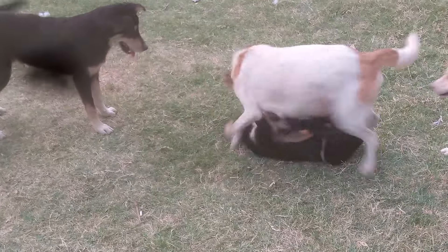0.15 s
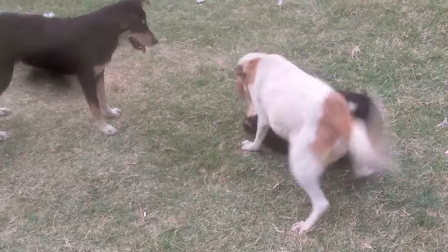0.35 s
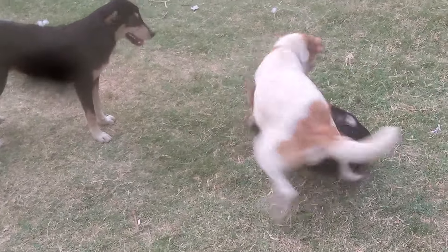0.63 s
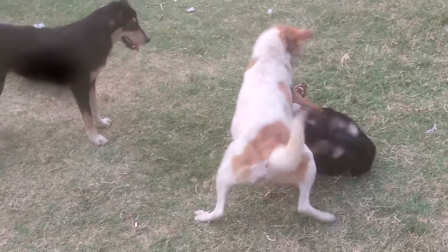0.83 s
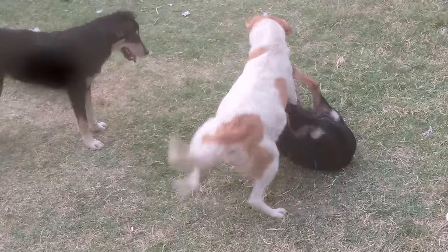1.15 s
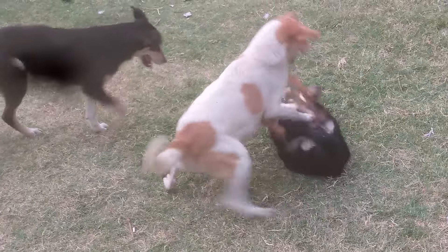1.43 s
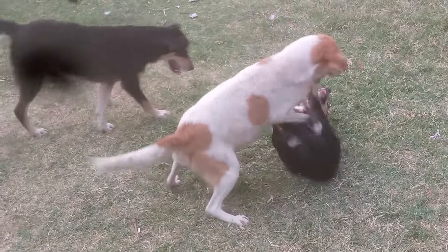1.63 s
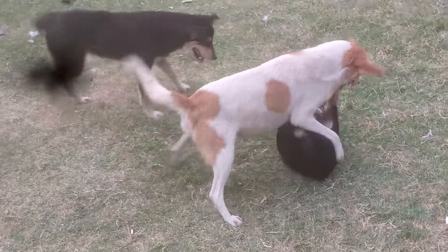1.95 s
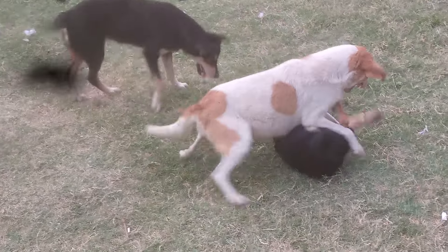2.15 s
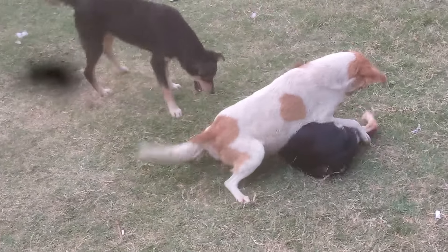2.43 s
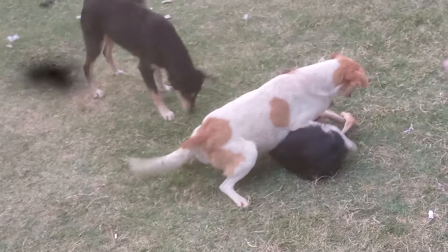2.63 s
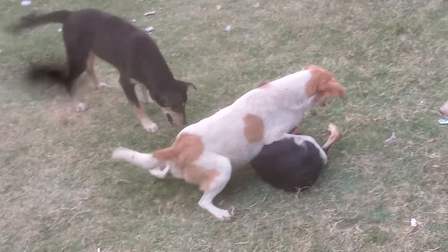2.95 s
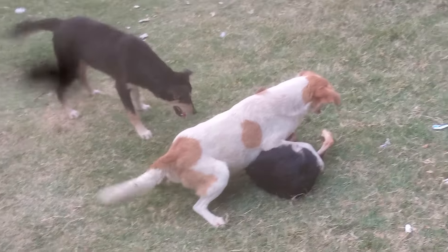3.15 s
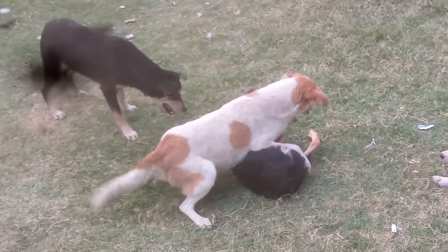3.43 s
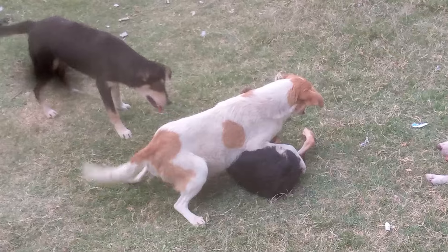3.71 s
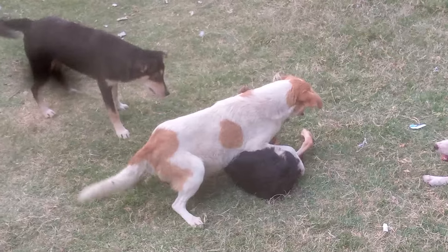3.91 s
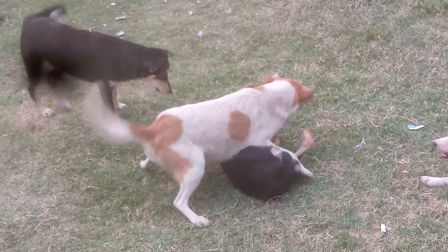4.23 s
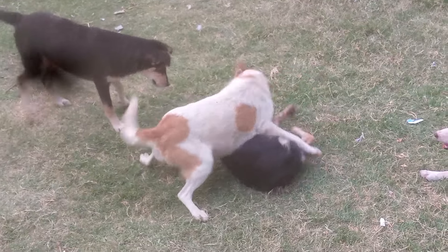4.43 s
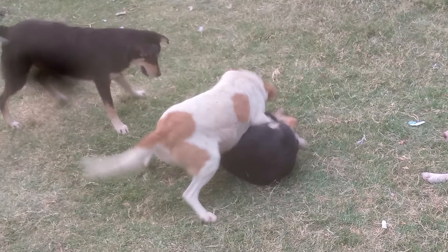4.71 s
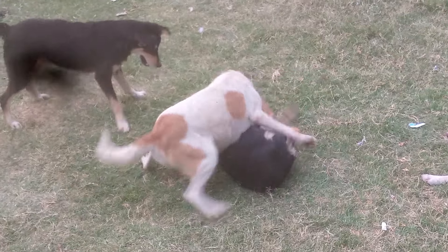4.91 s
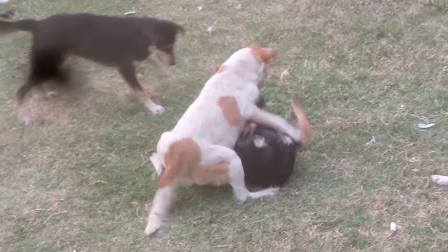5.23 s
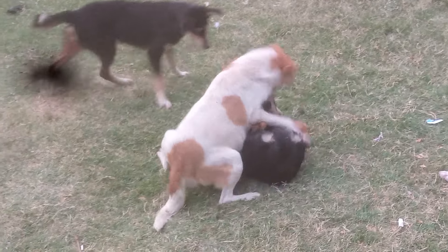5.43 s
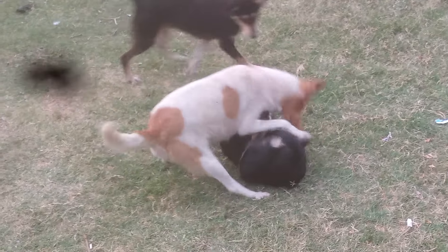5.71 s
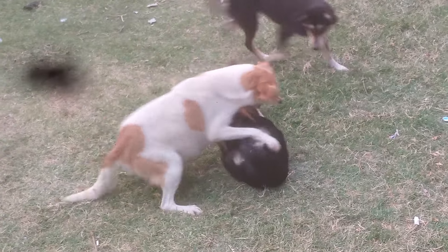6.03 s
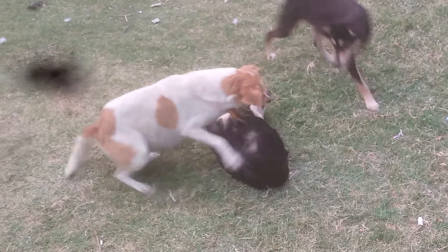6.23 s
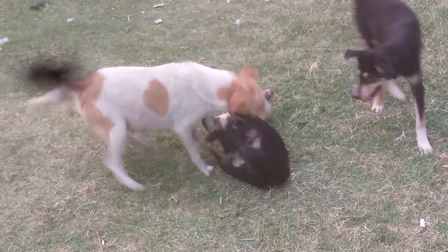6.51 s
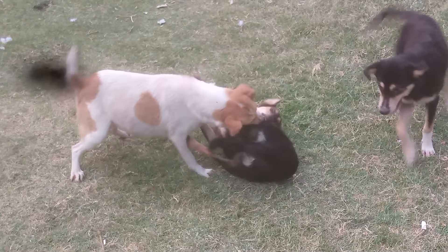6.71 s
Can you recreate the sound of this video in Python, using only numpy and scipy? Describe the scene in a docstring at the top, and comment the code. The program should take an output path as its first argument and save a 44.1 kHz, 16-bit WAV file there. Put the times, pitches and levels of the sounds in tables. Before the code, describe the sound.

Several dogs roughhouse on an open lawn a few metres from a small microphone. Hoarse snarls and quick piercing yelps crowd the first second, then a bark and quieter growling. Another short bark breaks in midway, followed by a sustained snarling outburst, fresh yelps and a last bark near the end. Dry grass rustles faintly, with a slight echo off a wall.

```python
"""Snarls and yelps burst out first: dogs wrestle on a lawn a few metres from a small microphone.
Snarls and barks are rough fold pulses ringing through throat, mouth, lips and teeth; yelps are thin,
near-pure high whistles; growls are puffs of air ringing a chest. A wall echoes, a bird whistles far off,
noise makes the grass rustle and the open air hum, and teeth and claws click."""
import sys
import numpy as np
from scipy import signal
from scipy.io import wavfile
from scipy.ndimage import uniform_filter1d

SR = 44100
rng = np.random.default_rng(int(sys.argv[2]) if len(sys.argv) > 2 else 0)


def bounce(signal):
    """Save signal as a 16-bit WAV file at the path given by the first command-line argument."""
    frames = np.transpose(np.atleast_2d(signal))
    limited = np.clip(frames, -1, 1)
    pcm = np.round(limited * 32767).astype(np.int16)
    wavfile.write(sys.argv[1], SR, pcm)


N = 302526


def gain_of(db):
    """Decibels to amplitude."""
    return 10 ** (np.asarray(db) / 20)


def evened(x):
    """Scales to rms 1."""
    return x / np.sqrt(np.mean(x ** 2) + 1e-20)


def add(mix, s, sound):
    """Mixes a sound in at s seconds."""
    part = mix[round(s * SR):][:len(sound)]
    part += sound[:len(part)]


def played(rows):
    """Start time and the columns of a table, joined sample by sample."""
    s, *columns = np.transpose(rows)
    t = np.arange(s[0], s[-1], 1 / SR)
    return s[0], *(np.interp(t, s, c) for c in columns)


def curve(rows):
    """A table of (seconds, dB) as a gain over the whole scene."""
    return gain_of(np.interp(np.arange(N) / SR, *np.transpose(rows)))


def patches(shape, band_span, frame_span):
    """Random blobs over frequency and time, rms 1."""
    blobs = uniform_filter1d(rng.standard_normal(shape), size=band_span, axis=0)
    return evened(uniform_filter1d(blobs, size=frame_span, axis=1))


def unsteady(count, size, depth):
    """A gain that trembles about 1, blurring a tone."""
    slow = uniform_filter1d(uniform_filter1d(rng.standard_normal(count), size), size)
    return 1 + depth * evened(slow)


def resonate(x, hz, width):
    """Shifts the curve hz down to zero, smooths twice, and shifts back: a steep resonance."""
    turn = np.exp(2j * np.pi * np.cumsum(hz * np.ones(len(x))) / SR)
    r = np.exp(-np.pi * width / SR)
    return 2 * (turn * signal.lfilter([(1 - r) ** 2], np.poly([r, r]), x / turn)).real


def steady(x, span_s):
    """Divides out the slow level, so that effort alone sets loudness."""
    return x / np.sqrt(abs(uniform_filter1d(x ** 2, round(span_s * SR))) + 1e-20)


BASS_DB, HUM_PATCHY_DB = -81, 3  # steady bass level; rms depth of the patches
# Colour of the open air. Each row: frequency in Hz, relative noise density in dB.
AIR_COLOUR = [(18, -36.5), (30, -14.5), (118, -7), (419, -28), (670, -26), (784, -21), (1160, -24.5),
              (1410, -23.5), (1750, -24), (2250, -32.5), (3200, -60.5), (4160, -82), (7040, -120)]
# The hum over the lawn above 350 Hz. Each row: time in seconds, level in dB.
HUM_LEVEL = [(0, -35), (.76, -74.5), (1.01, -62), (1.3, -71.5), (1.6, -60), (2.83, -74.5), (3.4, -61.5),
             (3.69, -67.5), (4.11, -73.5), (5.0, -62), (5.33, -68), (5.66, -66.5), (6.1, -62.5),
             (6.4, -66.5), (6.86, -65)]
# A faint fizz around 15200 Hz. Each row: time in seconds, level in dB.
FIZZ_LEVEL = [(0.05, -83), (0.959, -80.5), (1.038, -67.5), (1.089, -88), (1.85, -76.5), (2.06, -115),
              (2.32, -69), (2.4, -100), (2.671, -79), (3.03, -91.5), (5.739, -86), (6.058, -80),
              (6.55, -90), (6.61, -68), (6.78, -99), (6.86, -94)]


def air():
    """Patchy outdoor hum over a steady bass, swelling with the breath of each snarl, and a fizz at the top."""
    frames, hz = N // 256 + 5, np.fft.rfftfreq(1024, 1 / SR)[:, None]
    a, b = rng.standard_normal((2, 513, frames))
    noise = (a + 1j * b) * gain_of(HUM_PATCHY_DB * patches((513, frames), 5, 8))
    f, db = np.transpose(AIR_COLOUR)
    colour = gain_of(np.interp(np.log(hz + 1), np.log(f), db))
    top = gain_of(-12 * ((hz - 15200) / 1500) ** 2)
    shapes = colour * (hz <= 350), colour * (hz > 350), top
    bass, hum, fizz = (evened(signal.istft(noise * m, nperseg=1024, noverlap=768)[1][:N]) for m in shapes)
    return gain_of(BASS_DB) * bass + (curve(HUM_LEVEL) + breath()) * hum + curve(FIZZ_LEVEL) * fizz


BIRD_FALL_S, BIRD_FADE_DB = .035, -24.5  # time constant of glide and fade; depth of the fade
# Gliding whistles far off. Each row: start and length in seconds, start and end pitch in Hz,
# level at the start in dB.
BIRD_WHISTLES = [(1.667, 0.17, 3760, 2860, -57), (1.963, 0.16, 3840, 3300, -64),
                 (5.949, 0.15, 3840, 3970, -49.5), (6.105, 0.21, 4200, 3074, -48.5)]


def bird(start, length, hz, end_hz, db):
    """A slightly hoarse whistle: pitch and level settle together, fast at first."""
    t = np.arange(0, length, 1 / SR)
    settling = np.exp(-t / BIRD_FALL_S)
    glide = end_hz + (hz - end_hz) * settling
    tone = unsteady(len(t), 120, 0.53) * np.sin(2 * np.pi * np.cumsum(glide) / SR)
    level = gain_of(db + BIRD_FADE_DB * (1 - settling))
    return start, np.sqrt(2) * level * tone * signal.windows.tukey(len(t), .15)


GRASS_PATCHY_DB = 7  # rms depth of the patches
# Dry grass under paws. Each row: time in seconds, level in dB.
RUSTLE_LEVEL = [(0, -47.5), (.32, -63.5), (.71, -73), (1.13, -66), (1.36, -89), (1.53, -62.5),
                (1.87, -72.5), (4.26, -116), (4.34, -51), (4.93, -77), (5.2, -75.5), (5.58, -69),
                (5.69, -68.5), (6.1, -61.5), (6.32, -77.5), (6.61, -72), (6.73, -55.5), (6.86, -93)]
# Colour of the grass. Each row: frequency in Hz, relative noise density in dB.
GRASS_COLOUR = [(2300, -25), (2700, 3.5), (3800, 9), (4800, -12), (5800, -5), (7200, -32.5), (12000, -29.5),
                (15800, -27)]


def rustle():
    """Thin, very patchy treble noise."""
    frames, hz = N // 128 + 5, np.fft.rfftfreq(512, 1 / SR)[:, None]
    a, b = rng.standard_normal((2, 257, frames))
    f, db = np.transpose(GRASS_COLOUR)
    colour_db = np.interp(np.log(hz + 1), np.log(f), db, left=-90)
    patchy_db = GRASS_PATCHY_DB * patches((257, frames), 3, 14)
    hiss = signal.istft((a + 1j * b) * gain_of(colour_db + patchy_db), nperseg=512, noverlap=384)[1]
    return curve(RUSTLE_LEVEL) * evened(hiss[:N])


# Teeth and claws. Each row: start in seconds, level at the start in dB.
TICKS_AT = [(0.676, -66), (4.0771, -72), (4.1165, -58.5), (5.537, -61), (5.5574, -54.5), (6.5959, -51),
            (6.6164, -51)]


def tick(db):
    """A dry bright click: a high tone dying within milliseconds."""
    t = np.arange(100) / SR
    return gain_of(db - 60 * t / 0.0028) * np.sin(2 * np.pi * 11500 * t)


YARD_DB, YARD_T60 = -33, 0.65  # level of the scattered tail; seconds to fall 60 dB
# The wall. Each row: echo delay in seconds, level in dB.
WALL_ECHOES = [(0.033, -15.5), (.09, -26.5), (.17, -35)]


def yard(x):
    """Single echoes off a wall, with a dull scattered tail."""
    t = np.arange(SR // 2) / SR
    scatter = rng.choice([-1., 1.], len(t)) * (rng.random(len(t)) < .05) * (t > .02)
    tail = signal.lfilter(*signal.butter(2, 3000, fs=SR), scatter * gain_of(-60 * t / YARD_T60))
    tail *= gain_of(YARD_DB) / np.linalg.norm(tail)
    for s, db in WALL_ECHOES:
        add(tail, s, gain_of([db]))
    return signal.oaconvolve(x, tail)[:N]


def streaky(x, patchy_db=3.3):
    """Streaky, patchy sound: narrow bands swell and fade at random."""
    z = signal.stft(x, nperseg=1024, noverlap=768)[2]
    gain = gain_of(patchy_db * patches(z.shape, 3, 8))
    return signal.istft(z * evened(gain), nperseg=1024, noverlap=768)[1][:N]


def folds(hz, rough, weak_db, count):
    """Vocal folds: strong and weak pulses in turn, drifting, shaken and mixed with puffs of air."""
    shake, drift = (evened(uniform_filter1d(rng.standard_normal(count), size)) for size in (200, 5000))
    turns = np.cumsum(hz * (1 + 0.19 * rough * shake + .08 * drift)) / SR
    cycle = turns.astype(int)
    size_db = rough * 3 * rng.standard_normal(cycle[-1] + 1)[cycle] + weak_db * (cycle % 2)
    pulses = np.diff(cycle, prepend=0) * np.sqrt(SR / hz)
    puffs = evened((0.68 + np.exp(-(turns % 1) / 0.77)) * rng.standard_normal(count))
    return gain_of(size_db) * ((1 - rough) * pulses + rough * puffs)


GROWL_HZ = 63.45  # mean puff rate
GROWL_EDGE_S, PURR_DB = .06, -74.5  # fade at each end; a faint purr lies under all growls
# Resonances of the chest, lowest first. Each row: frequency in Hz, width of each smoothing in Hz,
# relative level in dB (the lowest is levelled apart from the rest).
CHEST_RINGS = [(116, 68, 0), (190, 20, 10.5), (276, 26, 5.5), (350, 7.7, -17)]
# Chest growls. Each row: start and length in seconds, effort in dB, change to the end in dB,
# share of the lowest resonance in dB.
GROWLS_AT = [(0, 0.08, -46.5, -2, -11), (0.161, 0.6, -44.5, -14.5, -26), (0.744, 0.57, -66.5, -7, -4.5),
             (1.416, 0.69, -57, -8.5, -1), (2.106, 0.37, -48.5, -25, 0), (2.709, .9, -49, -7, -2),
             (4.24, 0.12, -57, -5, -9.5), (4.471, 0.59, -47, -1.5, -26.5), (5.243, 0.31, -57.5, -6, 0),
             (5.669, 0.35, -54, -1, -8), (5.977, .13, -54.5, -3, 0), (6.134, 0.24, -50.5, -22, -1.5),
             (6.678, .25, -57, 15, -6)]


def growl():
    """Slow uneven puffs of air ring the chest with the mouth shut."""
    drive = folds(GROWL_HZ, 1.0, -1.6, N)
    low, *upper = (gain_of(db) * resonate(drive, f, w) for f, w, db in CHEST_RINGS)
    low, upper = steady(low, 1.0), steady(sum(upper), 0.93)
    out, t = gain_of(PURR_DB) * (low + upper), np.arange(N) / SR
    for start, length, effort_db, change_db, low_db in GROWLS_AT:
        edges = np.clip(np.minimum(t - start, start + length - t) / GROWL_EDGE_S, 0, 1) ** 2
        share = np.clip(gain_of(low_db), 0, .95)
        level = edges * gain_of(effort_db + change_db * np.clip((t - start) / length, 0, 1))
        out += level * (share * low + np.sqrt(1 - share ** 2) * upper)
    return out


FLUTTER_HZ = 115.7  # mean rate
SOFT_DB, TREMBLE_PER_DB = -33.5, 0.08  # tones below this level tremble more, by this depth per dB
# Yelps, one table each. Each row: time in seconds, pitch in Hz, level in dB, flutter depth 0-1.
YELP_TRACKS = [
    [(0.59, 2037, -40.5, 0.07), (0.612, 1932, -24.5, 0.04), (0.644, 2107, -26.5, 0.02),
     (0.69, 2012, -16.5, 0), (0.708, 1910, -42.5, 0.1), (0.716, 2077, -43.5, 0.14), (0.8, 2048, -51, 0)],
    [(0.962, 1880, -61.5, 0.05), (0.968, 2066, -29, 0.13), (0.976, 1938, -15.5, 0), (0.99, 1727, -22, 0.14),
     (1.004, 1729, -17.5, 0.05), (1.048, 1922, -16.5, 0), (1.105, 1709, -43.5, 0.05)],
    [(1.11, 1876, -45, 0.05), (1.122, 1845, -31, 0.05), (1.134, 1920, -47, 0), (1.16, 1920, -25, 0),
     (1.202, 1959, -23, 0.02), (1.232, 1957, -39.5, 0), (1.3, 1914, -47, 0.05)],
    [(0.3, 1920, -37, 0), (0.318, 2121, -39.5, 0.05), (0.336, 1943, -24.5, 0), (0.366, 1953, -18.5, 0.1),
     (0.42, 1985, -46.5, 0.13)],
    [(0.44, 1945, -58, 0.15), (0.47, 1970, -26, 0.1), (0.51, 1966, -24, 0), (0.558, 1880, -33.5, 0),
     (0.58, 1974, -45.5, 0.1)],
    [(2.1, 2024, -75, 0.11), (2.162, 1893, -61.5, 0.2), (2.216, 2020, -62, 0.2), (2.32, 1994, -62.5, 0.2),
     (2.33, 1890, -58, 0.1)],
    [(2.37, 2297, -70.5, 0.05), (2.408, 2325, -57.5, 0.07), (2.446, 2322, -72, 0.1), (2.486, 2306, -70, 0),
     (2.56, 2180, -69, 0.16)],
    [(6.03, 2150, -62.5, 0.1), (6.046, 2134, -41.5, 0), (6.084, 2183, -36, 0.04), (6.132, 2236, -53.5, 0),
     (6.2, 2207, -74.5, 0.13)],
    [(5.138, 2340, -45, 0), (5.152, 2197, -41, .3), (5.166, 1948, -18, 0.05), (5.18, 1921, -16, 0.09),
     (5.2, 2010, -31.5, .4), (5.3, 1932, -49.5, 0.77)],
    [(5.308, 2286, -47, 0.1), (5.325, 2100, -33, 0), (5.34, 1960, -26, 0.2), (5.36, 1960, -27, .2),
     (5.385, 1983, -47, 0.8), (5.5, 2030, -76.5, 0.3)],
    [(5.838, 2400, -66, 0.1), (5.848, 2243, -27, 0), (5.866, 2020, -22.5, 0.06), (5.89, 2018, -28, 0.42),
     (5.92, 2100, -42, 0.9), (6.0, 2074, -50, 0.8)],
]
# Overtones of a yelp. Each row: multiple of the pitch, level in dB for a yelp at -25.5 dB.
YELP_OVERTONES = [(2, -33), (3, -41.5), (4, -51)]


def yelp(rows):
    """A near-pure whistle of the folds with broken overtones; a slower flutter throws side tones above it."""
    s, hz, level_db, depth = played(rows)
    count = len(hz)
    phase = 2 * np.pi * np.cumsum(hz) / SR
    flutter = 2 * np.pi * FLUTTER_HZ * np.cumsum(unsteady(count, 400, .15)) / SR
    tremble = 0.092 + TREMBLE_PER_DB * np.maximum(SOFT_DB - level_db, 0)
    side_tones = np.sin(phase + flutter) + np.sin(phase + 2 * flutter)
    tone = unsteady(count, 200, tremble) * np.sin(phase) + depth * unsteady(count, 90, 0.27) * side_tones
    strain_db = -0.1 * (level_db + 25.5)  # overtones linger as the cry fades
    for k, db in YELP_OVERTONES:
        broken = unsteady(count, 60, .6) * unsteady(count, 600, .4)
        overtone = np.sin(k * phase) + depth * np.sin(k * (phase + 2 * flutter))
        tone += gain_of(db + strain_db) * broken * overtone
    return s, np.sqrt(2) * gain_of(level_db) * tone * signal.windows.tukey(count, .08)


# Steady ring of the teeth. Each row: frequency in Hz, width of each smoothing in Hz, relative level in dB.
TEETH_RINGS = [(2385, 130, 9), (3440, 900, -0.5), (5940, 2500, -26)]


def voice(rows, pulse_hz, rough, mouth_width, weak_db):
    """The folds sound through throat, mouth, cheeks, lips and the rasp at the teeth."""
    s, effort_db, throat_hz, throat_db, mouth_hz, lips_hz, lips_db, rasp_db, rasp_hz = played(rows)
    drive = folds(pulse_hz, rough, weak_db, len(effort_db))
    # an open mouth radiates no bass
    drive = signal.sosfilt(signal.butter(6, 390, "high", fs=SR, output="sos"), drive)
    throat = steady(resonate(drive, throat_hz, 210), 0.057)
    cheeks = gain_of(-13.5) * resonate(drive, 1.1 * mouth_hz, 590)
    mouth = steady(resonate(drive, mouth_hz, mouth_width) + cheeks, 0.41)
    lips = steady(resonate(drive, lips_hz, 546), 0.11)
    teeth = sum(gain_of(db) * resonate(drive, f, w) for f, w, db in TEETH_RINGS)
    rasp = steady(resonate(drive, rasp_hz, 370) + teeth, 0.043)
    tract = gain_of(throat_db) * throat - mouth + gain_of(lips_db) * lips - gain_of(rasp_db) * rasp
    return s, gain_of(effort_db - 1) * tract * signal.windows.tukey(len(drive), .08)


CLEAR_ENDS_DB, TREMBLE = -12, 0.086  # level at both ends against the peak; least tremble depth
# Clear tones that the folds lock onto. Each row: start and length in seconds, start and end pitch in Hz,
# peak level in dB, peak at this share of the length, octave in dB against the tone,
# dip of the hoarse voice meanwhile in dB (values above 0 count as none).
CLEAR_TONES = [(.09, 0.11, 1040, 1184, -21, 0.45, -24, -1),
               (0.206, 0.096, 1205, 1392, -25.5, 0.5, -27.5, 0),
               (1.28, 0.036, 703, 831, -31, 0.96, -21, -2.5), (1.315, 0.09, 833, 740, -15.5, 0.47, -18, -4),
               (1.42, 0.12, 1200, 1123, -44.5, 0, -17, 0), (2.152, .15, 980, 993, -58, .4, -14, 0),
               (2.58, 0.067, 867, 995, -24.5, 0.6, -29, -2), (2.625, 0.061, 1021, 958, -20, 0.53, -22, -1),
               (2.869, .22, 1010, 1057, -45, 0.03, -21.5, -2.5),
               (3.51, 0.068, 1050, 1030, -54.5, .6, -20, 0),
               (4.064, 0.072, 861.4, 1038, -17.5, 0.85, -20.5, -0.5),
               (4.125, .052, 1303, 1227, -17.5, .4, -16.5, -16.5),
               (4.169, 0.029, 912, 787, -23.5, 0.52, -1.5, -1),
               (4.385, 0.044, 925, 960, -21.5, 0.5, -8.5, -2.5),
               (4.44, .07, 1122, 1243, -23.5, 0.2, -28.5, -4.5),
               (4.518, 0.11, 1050, 1088, -29, 0.8, -14.5, 2), (5.248, 0.15, 900, 950, -56.5, 0.35, -9.5, 0),
               (5.533, 0.076, 900, 1082, -15.5, .5, -16, -2.5),
               (5.584, 0.038, 1200, 1350, -25, 0.5, -7, -2), (5.838, 0.098, 800, 660, -39.5, 0.16, -21, 0),
               (6.555, 0.082, 720.4, 890.6, -21.5, 0.83, -20, -0.5),
               (6.615, 0.059, 897, 677, -20.5, .2, -14.5, -3.5)]


def clear(start, length, hz, end_hz, db, top, octave_db):
    """A trembling, gliding tone that swells and fades, with its octave and a weaker third multiple."""
    u = np.arange(0, 1, 1 / (length * SR))
    phase = 2 * np.pi * np.cumsum(hz + u * (end_hz - hz)) / SR
    swell_db = np.interp(u, [0, np.clip(top, .05, .95), 1], [CLEAR_ENDS_DB, 0, CLEAR_ENDS_DB])
    octave = unsteady(len(u), 300, .3) * np.sin(2 * phase)
    third = gain_of(-13) * unsteady(len(u), 120, .7) * np.sin(3 * phase)
    tremble = TREMBLE + TREMBLE_PER_DB * max(SOFT_DB - db, 0)
    tone = unsteady(len(u), 250, tremble) * np.sin(phase) + gain_of(octave_db) * (octave + third)
    return start, np.sqrt(2) * gain_of(db + swell_db) * tone * signal.windows.tukey(len(u), .2)


def hoarse_dips():
    """The hoarse voice drops while the folds hold a clear tone."""
    dip_db = np.zeros(N)
    for start, length, *_, db in CLEAR_TONES:
        add(dip_db, start, min(db, 0) * signal.windows.tukey(round(length * SR), .3))
    return gain_of(dip_db)


RASP_HZ = 2505  # the moving rasp, where a bark starts and throughout a snarl
ATTACK_S, ONSET_DB, HELD, RELEASE_DB = 0.023, -36.5, 0.61, -26.5  # HELD: share of the length
TAIL, TAIL_DB = 1.25, -16.5  # a bark dies out after its release: (share of its length, further dB)
BARK_THROAT_HZ, BARK_LIPS_HZ = 612, 1775
LIPS_RISE_DB, RASP_RISE_HZ = 6.5, 350  # the bark brightens as it ends: rise per bark length
# Barks a few metres off. Each row: start and length in seconds, effort in dB (heard 1 dB lower),
# swell while held in dB, mouth at start and end in Hz, throat in dB, lips at the start in dB,
# rasp at start and end in dB.
BARKS_AT = [(1.272, 0.18, -24, 4, 848, 912, -8.5, -10, -41.5, -12),
            (2.566, 0.21, -24.5, 1, 1028, 1036, -10.5, -7, -28.5, -13.5),
            (4.047, .19, -24, 0, 900, 1080, -13.5, -7, -29.5, -8.5),
            (5.514, 0.15, -21.5, -3.5, 1042, 1150, -21, -6, -44, 0.5),
            (6.535, .18, -26.5, 7, 915, 920, -11.5, -4.5, -32, -13)]


def bark(start, length, effort_db, swell_db, hz, end_hz, throat_db, lips_db, rasp_db, end_db):
    """Settings of the tract along a bark: attack, hold, release, tail."""
    released_db = swell_db + RELEASE_DB
    steps = [(0, ONSET_DB), (ATTACK_S / length, 0), (HELD, swell_db), (1, released_db),
             (TAIL, released_db + TAIL_DB)]
    rows = []
    for u, db in steps:
        moved = min(u, 1)
        rows.append((start + u * length, effort_db + db, BARK_THROAT_HZ, throat_db,
                     hz + moved * (end_hz - hz), BARK_LIPS_HZ, lips_db + u * LIPS_RISE_DB,
                     rasp_db + moved * (end_db - rasp_db), RASP_HZ + u * RASP_RISE_HZ))
    return rows


# the rasp fades less than the voice: dB gained per dB of effort under the reference
RASP_LAG, REFERENCE_DB = 0.27, -33.5
SLACK = .4  # slow, slack folds leak more air: roughness grows as this power of the pulse length
# Snarls, one table each, long ones first; last, the slow creak that ends a bark.
# Each row: time in seconds, effort in dB (heard 1 dB lower), mouth in Hz, throat in dB.
SNARL_TRACKS = [
    [(0.0, -21, 1180, 4.5), (0.006, -26, 1318, -19), (0.104, -24.5, 1090, -9), (0.134, -23.5, 1090, -11.5),
     (0.192, -27, 1084, -23), (0.258, -29.5, 1310, -6), (0.334, -25.5, 1090, -14), (0.39, -38.5, 1130, -4),
     (0.42, -57, 1140, -7)],
    [(0.43, -46.5, 1013, -2), (0.444, -43.5, 957, 4.5), (0.468, -29.5, 966, 2.5), (0.554, -25.5, 1080, -13),
     (0.602, -39.5, 1040, 3), (0.644, -30, 943, -5.5), (0.678, -36, 1100, -1), (0.726, -48, 1170, -7),
     (0.76, -71.5, 1150, -19.5)],
    [(1.47, -51.5, 1150, -11), (1.566, -59.5, 1370, 12), (1.802, -39, 1216, 7.5), (1.824, -46.5, 1270, 13),
     (1.852, -27, 1294, -5), (1.92, -39.5, 1320, 5), (1.938, -58.5, 1320, 9.5), (2.026, -54, 1380, 6),
     (2.06, -90, 1370, -4)],
    [(3.12, -56, 970, 4), (3.146, -41, 946, -11.5), (3.166, -32.5, 910, -11), (3.198, -36, 936, -3),
     (3.236, -28.5, 986, -7.5), (3.362, -61.5, 1020, -7), (3.51, -58, 994, -8), (3.558, -63, 970, -8.5),
     (3.6, -74.5, 986, 6.5)],
    [(4.29, -52.5, 1067, -4), (4.34, -24.5, 1021, -7), (4.396, -21, 1045, -25), (4.628, -27, 1105, -7),
     (4.75, -34, 1197, -0.5), (4.802, -27.5, 925, -1.5), (4.898, -29.5, 1260, -4), (4.998, -32, 947, 2),
     (5.06, -66, 1160, -0.5)],
    [(5.63, -39, 1110, -9), (5.678, -43, 1180, -1), (5.712, -43.5, 1234, -3.5), (5.744, -25, 1286, -14.5),
     (5.78, -43, 1250, 3), (5.824, -41, 1136, -26), (5.868, -44, 906, 0.5), (5.936, -67.5, 940, 8),
     (5.97, -72, 1180, -4)],
    [(0.8, -60.5, 957, -4), (0.846, -51, 930, -13.5), (0.912, -55, 864, -23), (0.95, -62.5, 1130, 1.5)],
    [(2.78, -37, 1080, 0), (2.808, -54.5, 1090, -9), (2.95, -45, 1055, -0.5), (3.1, -60, 1060, -25.5)],
    [(6.7, -37.5, 929, -5), (6.77, -51, 910, -6), (6.848, -44.5, 1030, 8), (6.86, -48, 1013, 8)],
    [(4.19, -27, 941, -22.5), (4.196, -31, 958, -5), (4.28, -49, 1080, -1.5), (4.31, -43, 1100, -6.5)],
]
# Colour of each snarl and of the creak. Each row: mean pulses per second, throat in Hz, lips in Hz,
# lips in dB, rasp in dB at the reference effort, breath in dB against the effort.
SNARL_TINTS = [(190.2, 563, 1820, -3, -30.5, -11.5), (187, 660, 1830, -8.5, -41, -7),
               (186.3, 620, 1600, -6, -56, -4), (184.3, 507, 1270, -11.5, -48.5, -16),
               (189.8, 536, 1725, -9.5, -29.5, -7.5), (177.6, 573, 1390, -9.5, -25.5, -12),
               (205, 680, 1830, 3.5, -28.5, -21), (191, 476, 1100, -26.5, -54, -9),
               (196.5, 523, 1600, -5, -27, -12), (47, 540, 1780, 3.5, -49, -4)]


def snarl(rows, throat_hz, lips_hz, lips_db, rasp_db):
    """Settings of the tract along a snarl or the creak."""
    return [(s, db, throat_hz, throat_db, hz, lips_hz, lips_db, rasp_db + RASP_LAG * (REFERENCE_DB - db), RASP_HZ)
            for s, db, hz, throat_db in rows]


def breath():
    """How strongly air rushes with each snarl and the creak, as a gain over time."""
    out = np.zeros(N)
    for rows, tint in zip(SNARL_TRACKS, SNARL_TINTS):
        s, effort_db, *_ = played(rows)
        add(out, s, gain_of(effort_db + tint[-1]) * signal.windows.tukey(len(effort_db), .08))
    return out


def scene():
    """The near dog is mostly dry; the yelps carry more echo; grass and fur swallow the voices' treble."""
    near, high = np.zeros((2, N))
    for rows, (pulse_hz, *tract, _) in zip(SNARL_TRACKS, SNARL_TINTS):
        rough = .31 * (SNARL_TINTS[0][0] / pulse_hz) ** SLACK
        add(near, *voice(snarl(rows, *tract), pulse_hz, rough, mouth_width=170, weak_db=-5))
    for row in BARKS_AT:
        add(near, *voice(bark(*row), pulse_hz=430, rough=.42, mouth_width=230, weak_db=-1.5))
    near = streaky(near) * hoarse_dips()
    for row in CLEAR_TONES:
        add(near, *clear(*row[:-1]))
    for rows in YELP_TRACKS:
        add(high, *yelp(rows))
    for row in BIRD_WHISTLES:
        add(high, *bird(*row))
    echoes = streaky(yard(gain_of(-11) * near + high))
    voices = near + high + growl() + echoes
    mix = signal.sosfilt(signal.butter(8, 6800, fs=SR, output="sos"), voices) + air() + rustle()
    for s, db in TICKS_AT:
        add(mix, s, tick(db))
    return mix[None]


def record(dry):
    """The small microphone drops the deepest bass; then a band limit at 15800 Hz."""
    thin = signal.sosfilt(signal.butter(3, 62, "high", fs=SR, output="sos"), dry)
    band_limit = signal.firwin(511, 15800, window=("kaiser", 9), fs=SR)
    return signal.oaconvolve(thin, band_limit[None], "same")


dry = scene()
out = record(dry)
bounce(out)
```